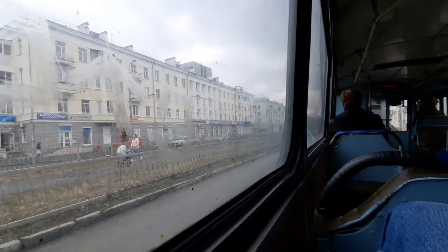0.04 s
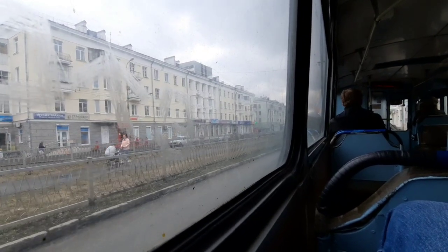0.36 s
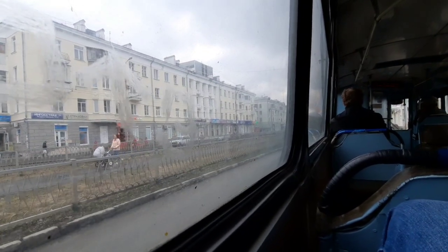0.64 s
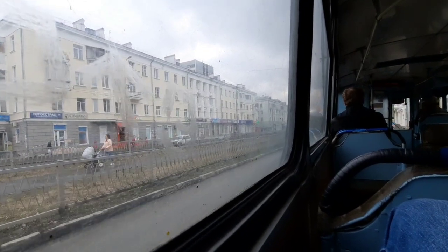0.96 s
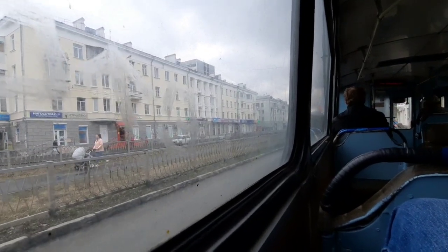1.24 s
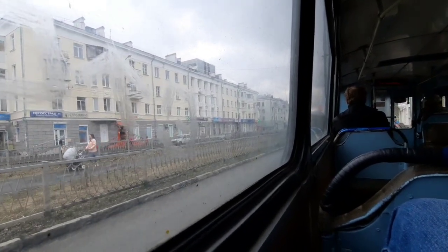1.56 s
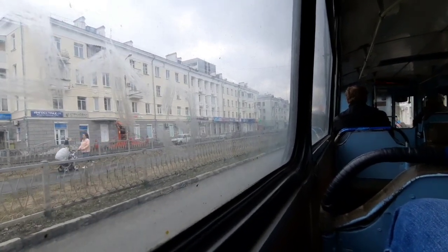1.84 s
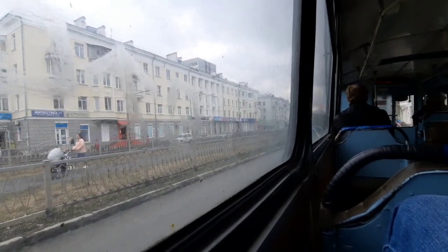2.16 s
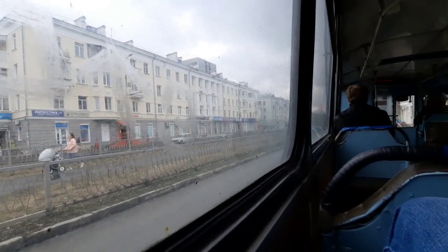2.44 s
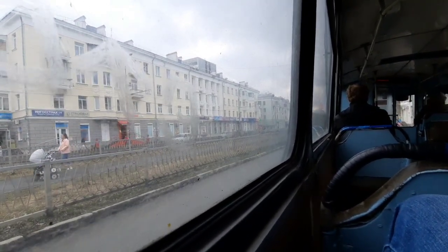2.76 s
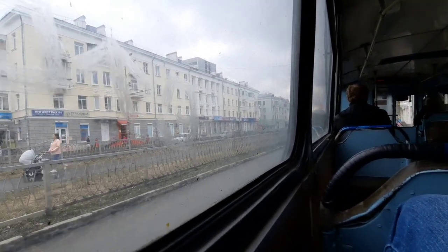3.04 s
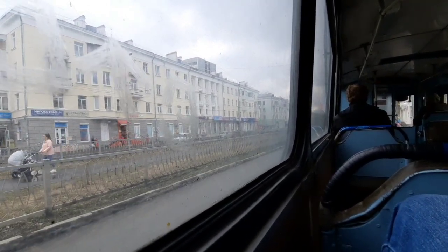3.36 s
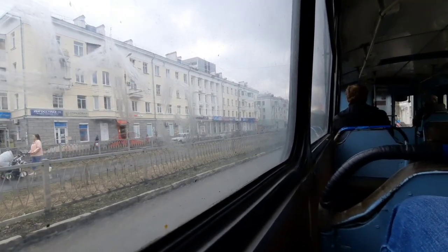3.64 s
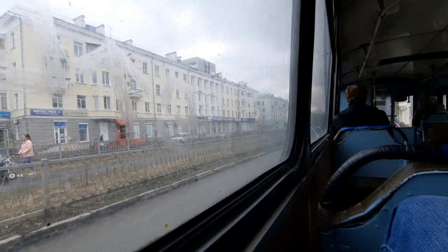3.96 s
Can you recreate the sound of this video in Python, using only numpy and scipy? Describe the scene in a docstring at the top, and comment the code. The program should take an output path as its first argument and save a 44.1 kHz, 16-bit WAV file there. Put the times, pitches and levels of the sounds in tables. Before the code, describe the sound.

A loud air brake hiss bursts out over the low rumble and hum of a moving bus, heard from inside. As the hiss dies away, rough road sets off floor thuds, panel knocks, rattles and short chirps.

```python
"""A trolleybus drive hums over the rumble of its tyres, heard from inside the rolling bus.
Loose trim ticks, and a thin friction squeal comes and goes. A brake valve vents a turbulent jet
of air, which dies away as the pressure drops. Meanwhile rough road jolts the bus: the floor thuds,
panels and seats knock, the body booms, and loose fittings rattle and chirp in the cabin."""
import sys
import numpy as np
from scipy import signal
from scipy.fft import rfft, irfft
from scipy.io import wavfile
from scipy.ndimage import uniform_filter1d, minimum_filter1d

SR = 44100
rng = np.random.default_rng(int(sys.argv[2]) if len(sys.argv) > 2 else 0)


def to_wav(sig):
    """Store sig (one row per channel, or 1-D mono) as 16-bit WAV at the path in sys.argv[1].

    Samples outside -1..1 are clipped; the rate is SR.
    """
    pcm = np.clip(np.atleast_2d(sig), -1, 1) * 32767
    pcm = np.round(pcm).astype(np.int16)
    wavfile.write(sys.argv[1], SR, pcm.T)  # frames by channels


N = 176400


def undb(db):
    """Amplitude ratio of a level in decibels."""
    return 10 ** (np.asarray(db) / 20)

def unit(x):
    """Normalisation to rms 1."""
    return x / np.sqrt(np.mean(x ** 2))

def clock():
    """Time of every sample in seconds."""
    return np.arange(N) / SR

def curve(rows, column=1):
    """Linear interpolation of one table column over time."""
    rows = np.array(rows)
    return np.interp(clock(), rows[:, 0], rows[:, column])

def gains(spectrum):
    """Frequency response through (Hz, dB) points, interpolated in log frequency."""
    hz, db = np.array(spectrum).T
    bin_hz = np.arange(N // 2 + 1) * SR / N
    return undb(np.interp(np.log(bin_hz + 1), np.log(hz), db))

def colour(x, spectrum):
    """Spectral shaping, normalised to rms 1."""
    return unit(irfft(rfft(x) * gains(spectrum), N))

def wander(rate_hz):
    """Smooth random modulation at rms 1."""
    hold = max(int(SR / rate_hz), 2)
    steps = np.repeat(rng.standard_normal(N // hold + 1), hold)
    return unit(uniform_filter1d(uniform_filter1d(steps, hold), hold)[:N])

def noise():
    """Two uncorrelated white noises."""
    return rng.standard_normal((2, N))

def phase_of(hz):
    """Phase in radians: the integral of frequency, from a random start."""
    return 2 * np.pi * (np.cumsum(hz) / SR + rng.random())

def impact(start, attack_s, hold_s, decay_s):
    """Envelope of a damped impact: linear rise, hold, exponential decay."""
    t = clock() - start
    return np.clip(t / attack_s, 0, 1) * np.exp(-np.maximum(t - attack_s - hold_s, 0) / decay_s)

def swell(start, length):
    """A half-sine envelope."""
    return np.sin(np.pi * np.clip((clock() - start) / length, 0, 1))

# Width of the cabin field. Each row: frequency in Hz, side minus mid in dB.
FIELD_WIDTH = [(60, -24.5), (200, -16), (380, -15), (700, -0.5), (1200, 1), (15000, 0)]
# Balance between the ears. Each row: frequency in Hz, left minus right in dB.
FIELD_BALANCE = [(100, 0), (230, 3.5), (400, 4), (700, 5.5), (1300, 1), (2400, -1), (5000, -1.5),
                 (15000, -2)]

def cabin_field(pair):
    """Interaural coherence: two unrelated signals become alike in the bass, diffuse in the treble."""
    mid, side = rfft(pair)
    width, lean = gains(FIELD_WIDTH), np.sqrt(gains(FIELD_BALANCE))
    left = (mid + width * side) * lean
    right = (mid - width * side) / lean
    return irfft(np.array([left, right]) / np.sqrt(1 + width ** 2), N)

# Gear hum. Each row: time in seconds, pitch in Hz, level in dB.
GEAR_HUM = [(0, 227.5, -22), (.2, 228.3, -17), (.6, 229.5, -20), (1.5, 230.7, -19), (1.68, 229.6, -24),
            (2.5, 232.9, -28.5), (2.9, 233.8, -24.5), (3.45, 237.3, -24.5), (4, 238.2, -23.5)]

def drive(hum_order=5, left_bias_db=1.56):
    """Rotational harmonics: shaft and gears sound at multiples of a slowly rising shaft rate."""
    shaft_hz = curve(GEAR_HUM) / hum_order * (1 + 0.00092 * wander(8.86))
    shaft = sum(undb(db + 2 * wander(5.7)) * np.sin(phase_of(order * shaft_hz))
                for order, db in [(1, -34), (2, -42), (3, -40)])
    gears = sum(undb(relative_db + 1.27 * wander(12)) * np.sin(phase_of(order * shaft_hz))
                for order, relative_db in [(hum_order, -0.5), (10, -22.5), (16, -33)])
    pan = undb(np.array([[left_bias_db], [-left_bias_db]]) / 2)
    return np.sqrt(2) * (shaft + gears * undb(curve(GEAR_HUM, column=2))) * pan

# Spectrum of the tyre rumble. Each row: frequency in Hz, relative density in dB.
ROAD_SPECTRUM = [(28, -32.5), (45, -4), (90, 1), (190, -0.5), (280, -0.5), (400, -9), (600, -14),
                 (950, -24), (1600, -28), (3200, -40.5), (7000, -45.5), (10000, -54), (14000, -50),
                 (16000, -51.5)]
# Strength of the rumble. Each row: time in seconds, level in dB.
ROAD_LEVEL = [(0, -25), (.8, -26), (1.5, -26.5), (2.4, -26.5), (3.3, -25.5), (3.7, -28.5), (4, -28)]

def road_rumble():
    """Structure-borne noise: tyre vibration reaches the cabin through the floor."""
    return cabin_field(colour(noise(), ROAD_SPECTRUM) * undb(curve(ROAD_LEVEL)))

def collisions(per_second=1000, scatter_db=0.5, decay_s=0.008):
    """Shot noise: small random collisions, each a decaying burst of noise, add in power."""
    strikes = (rng.random(N) < per_second / SR) * undb(scatter_db * rng.standard_normal(N))
    power = signal.lfilter([1], [1, -np.exp(-2 / (decay_s * SR))], strikes ** 2)
    return noise() * np.sqrt(power)

# Treble clatter of ticks and jolts. Each row: frequency in Hz, relative density in dB.
CLATTER_SPECTRUM = [(1500, -25), (4500, 1.5), (7500, 1), (10000, -9), (13000, -4), (16000, -16.5)]
# Ticks of loose trim. Each row: start in seconds, level in dB.
TRIM_TICKS = [(.35, -52), (.437, -51.5), (.485, -60.5), (.528, -51.5)]

def trim_ticks():
    """Impact noise: light, brief contacts of loose trim radiate mostly treble."""
    envelope = sum(undb(db) * impact(start, 0.002, 0, decay_s=0.01) for start, db in TRIM_TICKS)
    return cabin_field(envelope * colour(collisions(), CLATTER_SPECTRUM))

def reverberate(x, t60_s, direct_share):
    """Reverberation: direct sound plus dense, decaying reflections, different at each ear."""
    t = clock()[:SR // 2]
    response = rng.standard_normal((2, len(t))) * np.exp(-np.log(1000) * t / t60_s)
    response *= np.sqrt((1 - direct_share) / np.sum(response ** 2, axis=1, keepdims=True))
    response[:, 0] += np.sqrt(direct_share)
    return signal.fftconvolve(x[None], response, axes=1)[:, :N]

# A squeal and a higher, fainter one. Each row: time in seconds, pitch in Hz, level in dB.
SQUEAL = [(.93, 3495, -64), (.985, 3500, -41.5), (1.025, 3490, -52.5), (1.06, 3490, -38),
          (1.19, 3535, -42.5), (1.23, 3530, -47.5), (1.29, 3606, -54), (1.37, 3560, -64), (1.53, 3470, -61)]
HIGH_SQUEAL = [(1.31, 5620, -60), (1.325, 5540, -51), (1.4, 5520, -56), (1.435, 5430, -55),
               (1.465, 5500, -53), (1.49, 5550, -64), (1.58, 5520, -62)]
# Harmonics of the lower squeal, fundamental first. Each entry: relative level in dB.
SQUEAL_HARMONICS = [0.5, -17, -39]

def squeal(track, harmonics_db, jitter=0.0012, flutter_db=2):
    """Self-excited vibration: friction sustains a fluttering tone that rings in the cabin."""
    phase = phase_of(curve(track) * (1 + jitter * wander(200)))
    tone = sum(undb(db) * np.sin(k * phase) for k, db in enumerate(harmonics_db, 1))
    sounding = (clock() > track[0][0]) & (clock() < track[-1][0])
    envelope = sounding * undb(curve(track, column=2) + flutter_db * wander(70.2))
    return reverberate(np.sqrt(2) * tone * envelope, t60_s=0.41, direct_share=0.17)

# Air jet before its bass is cut. Each row: frequency in Hz, relative density in dB.
JET_SPECTRUM = [(700, -19), (1150, -8.5), (1500, -6), (1900, -7), (2350, -6.5), (2750, -3), (3500, -2),
                (4300, 0), (6100, -1), (7300, -1), (8300, -1), (9700, -7), (11000, -2.5), (12600, 0.5),
                (15400, -2)]
# The jet as the valve opens and the pressure drops. Each row: time in seconds, level in dB.
JET_LEVEL = [(1.522, -59), (1.538, -30.5), (1.555, -20), (1.6, -19), (1.72, -21.5), (1.9, -23), (2.22, -23),
             (2.5, -23.5), (2.7, -29), (2.86, -30), (3.0, -40), (3.17, -35.5), (3.3, -48), (3.42, -64)]

def air_brake(low_cut_hz=810, treble_hz=8000, dulling=0.21, flutter_db=0.38):
    """Turbulent jet noise: air hisses from the valve, fading and dulling as the pressure drops."""
    low_cut = signal.butter(2, low_cut_hz, "high", fs=SR, output="sos")
    jet = unit(signal.sosfilt(low_cut, colour(noise(), JET_SPECTRUM)))
    dull = signal.sosfiltfilt(signal.butter(2, treble_hz, fs=SR, output="sos"), jet)
    db = curve(JET_LEVEL)
    treble = (jet - dull) * undb(dulling * (db - db.max()))  # extra loss per dB of level drop
    return cabin_field((dull + treble) * undb(db + flutter_db * wander(39.1)))

# Responses of floor, panels and fittings. Each row: frequency in Hz, relative density in dB.
THUD_SPECTRUM = [(30, -28), (60, 1.5), (85, 5.5), (150, 8.5), (210, -6.5), (350, -38), (1500, -95)]
PANEL_SPECTRUM = [(60, -54), (150, -10.5), (240, 4), (320, 4.5), (410, -6), (520, -10.5), (720, -20.5),
                  (1100, -20), (3000, -70)]
RATTLE_SPECTRUM = [(200, -14), (450, 11), (750, 7), (1000, 2.5), (1400, 2.5), (2000, -1), (2900, -3.5),
                   (4200, -5.5), (7000, -36), (15000, -44)]
# Jolts of the bus: road bumps, and at 1.53 s the thump of the brake valve opening. Each row: # start in
# seconds, levels of floor thud, panel knock, rattle and treble clatter in dB, decay time in seconds.
JOLTS = [(1.53, -37.5, -22.5, -45, -55, 0.066), (1.71, -38, -24, -44, -50, 0.035),
         (1.806, -30.5, -26, -34.5, -46, 0.028), (2.137, -38, -21.5, -49, -50, 0.033),
         (2.245, -36, -22, -53, -50, .025), (2.294, -28, -24, -40.5, -55, 0.028),
         (2.431, -27, -26.5, -41, -50, 0.036), (2.517, -22.5, -33.5, -30.5, -51, 0.1),
         (2.7, -31, -29, -30, -53, 0.12), (2.762, -18.5, -19, -23, -33.5, 0.078),
         (2.794, -19, -20, -33, -38, 0.088), (2.851, -18.5, -16.5, -25, -33.5, 0.085),
         (2.902, -21.5, -10, -26.5, -50, 0.024), (2.93, -26, -30, -29, -56, 0.083),
         (3.091, -32, -42, -30.5, -57, 0.17), (3.147, -11, -17.5, -22.5, -35, 0.043),
         (3.198, -25, -47, -45, -50, 0.02), (3.305, -24.5, -28, -35.5, -47.5, 0.024),
         (3.334, -47, -23, -57, -63, 0.028), (3.45, -31, -33, -34.5, -47.5, 0.12),
         (3.516, -33.5, -27, -33, -45.5, 0.029)]

def jolts(attack_s=0.0062, hold_s=0.0099):
    """Shock excitation: each jolt shakes floor, panels and fittings, each in its own band."""
    shaking = 0
    for part, spectrum in enumerate((THUD_SPECTRUM, PANEL_SPECTRUM, RATTLE_SPECTRUM, CLATTER_SPECTRUM)):
        power = sum((undb(levels_db[part]) * impact(start, attack_s, hold_s, decay_s)) ** 2
                    for start, *levels_db, decay_s in JOLTS)
        shaking += colour(collisions(), spectrum) * np.sqrt(power)
    return cabin_field(shaking)

# Knocks of seats and doors. Each row: start in seconds, pitch in Hz, level in dB.
KNOCKS = [(1.808, 589, -28), (2.86, 558, -31), (2.916, 757, -21.5), (3.162, 479, -27.5), (3.331, 527, -31),
          (3.457, 573, -23)]

def hollow_knocks(pitch_scatter=0.08, decay_s=0.019):
    """Damped resonance: hollow parts ring briefly, with a blurred pitch."""
    knocks = 0
    for start, hz, db in KNOCKS:
        rings = np.array([np.sin(phase_of(hz * (1 + pitch_scatter * wander(250)))) for _ in range(2)])
        knocks += undb(db) * impact(start, 0.003, 0, decay_s) * rings
    return cabin_field(np.sqrt(2) * knocks)

# Chirps of rubbing fittings. Each row: start and length in seconds, pitch in Hz, level in dB,
# scatter as a fraction of the pitch.
CHIRPS = [(2.002, 0.076, 7250, -30.5, .03), (2.134, 0.072, 2900, -31.5, .12), (2.19, 0.073, 2880, -36, .12),
          (2.273, 0.051, 2755, -31.5, .12), (2.831, 0.045, 2900, -26.5, .11),
          (3.036, 0.038, 4790, -34, 0.058), (3.085, 0.093, 7800, -47, .025),
          (3.66, 0.022, 7560, -40, 0.025)]

def fitting_chirps(octave_db=-13):
    """Stick-slip friction: fittings catch and release in short squeaks of unsteady pitch."""
    chirps = 0
    for start, length, hz, db, scatter in CHIRPS:
        phase = phase_of(hz * (1 + scatter * wander(900)))
        tone = np.sin(phase) + undb(octave_db) * np.sin(2 * phase)
        chirps += undb(db) * swell(start, length) * tone
    return reverberate(np.sqrt(2) * chirps, t60_s=0.27, direct_share=0.38)

# Booms of the body. Each row: start and length in seconds, first and last pitch in Hz, level in dB.
BOOMS = [(2.433, 0.444, 100.8, 120.5, -23), (3.452, .16, 88, 86.9, -19)]

def body_booms(flutter_db=2):
    """Forced vibration: the body drones briefly as the wheels cross rough patches."""
    booms = 0
    for start, length, first_hz, last_hz, db in BOOMS:
        hz = np.interp(clock(), [start, start + length], [first_hz, last_hz])
        envelope = undb(db + flutter_db * wander(40)) * swell(start, length)
        booms += envelope * np.sin(phase_of(hz))
    return np.sqrt(2) * booms

def scene():
    """Superposition: all sources add at a window seat."""
    rolling = drive() + road_rumble() + trim_ticks()
    squeals = squeal(SQUEAL, SQUEAL_HARMONICS) + squeal(HIGH_SQUEAL, harmonics_db=[0])
    return rolling + squeals + air_brake() + jolts() + hollow_knocks() + fitting_chirps() + body_booms()

def record(dry, ceiling=0.72, window_s=0.012, top_hz=15500):
    """Peak and band limiting: the gain eases down around the tallest peaks, and the top is cut."""
    window = int(window_s * SR)
    allowed_gain = ceiling / np.maximum(np.abs(dry).max(axis=0), ceiling)
    gain = uniform_filter1d(minimum_filter1d(allowed_gain, window), window)
    low_pass = signal.ellip(12, 0.1, 80, top_hz, fs=SR, output="sos")
    return signal.sosfilt(low_pass, dry * gain)


dry = scene()
out = record(dry)
to_wav(out)
```